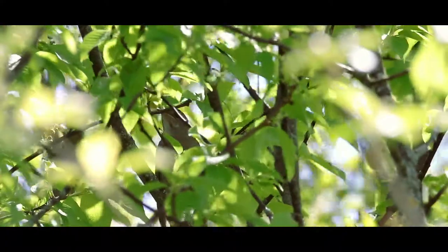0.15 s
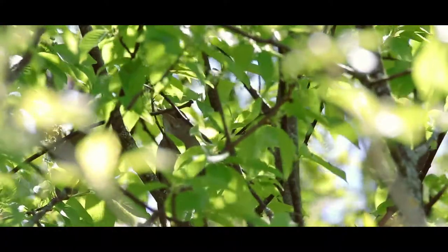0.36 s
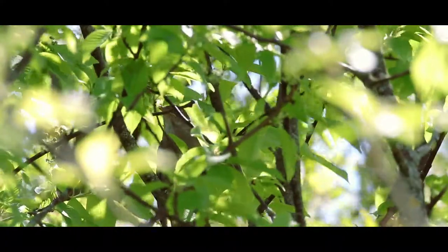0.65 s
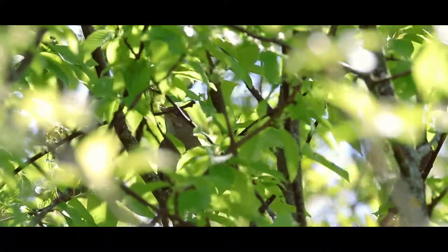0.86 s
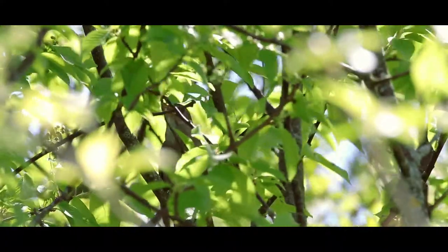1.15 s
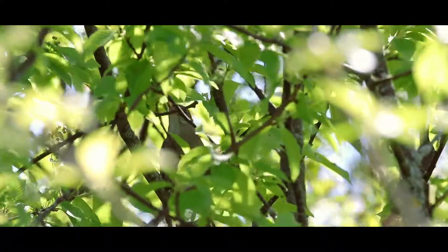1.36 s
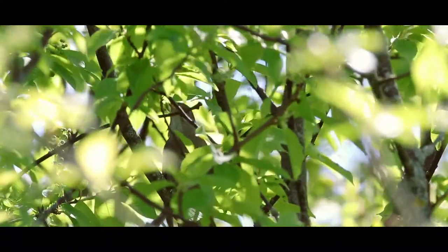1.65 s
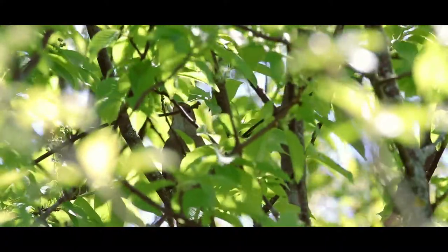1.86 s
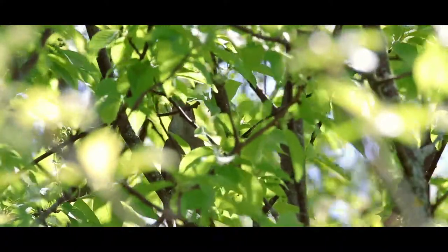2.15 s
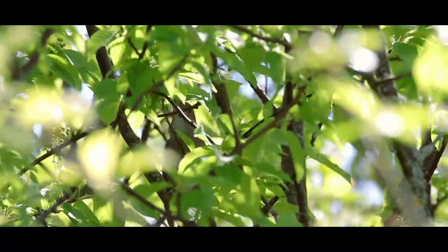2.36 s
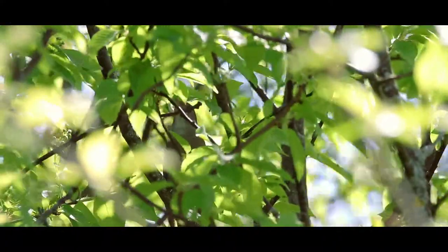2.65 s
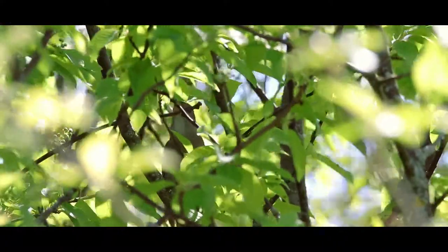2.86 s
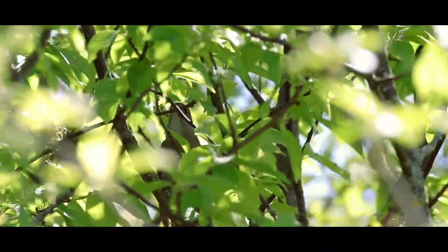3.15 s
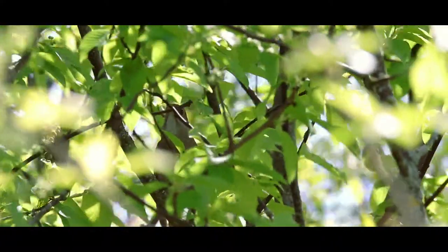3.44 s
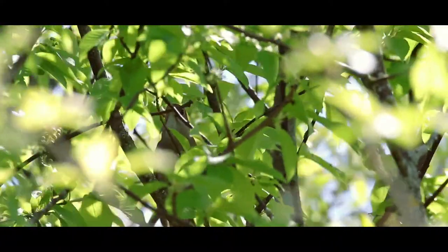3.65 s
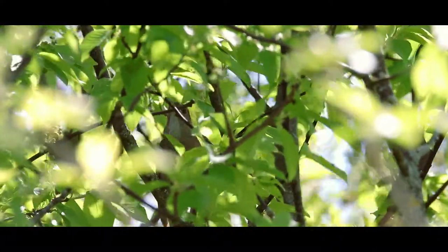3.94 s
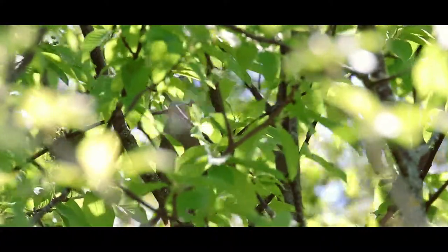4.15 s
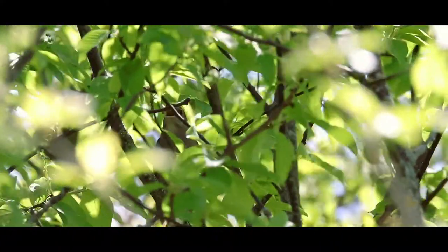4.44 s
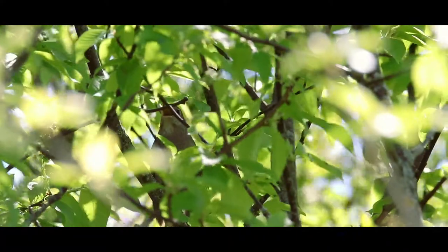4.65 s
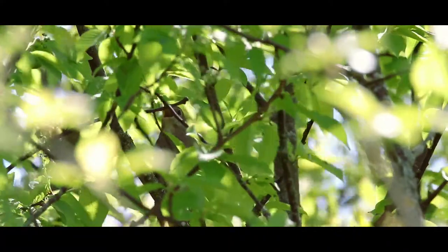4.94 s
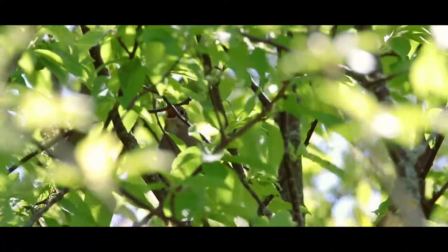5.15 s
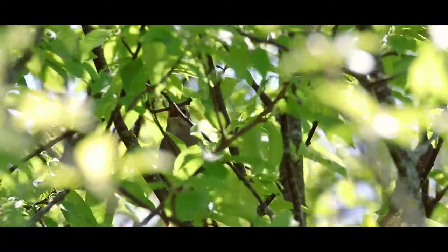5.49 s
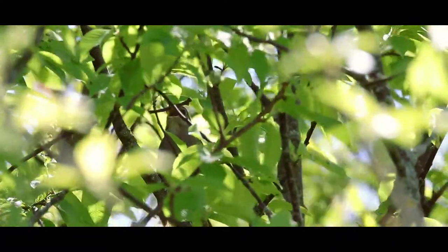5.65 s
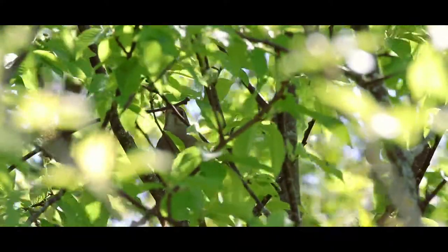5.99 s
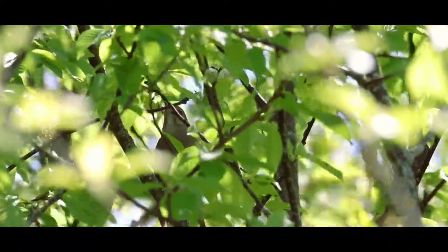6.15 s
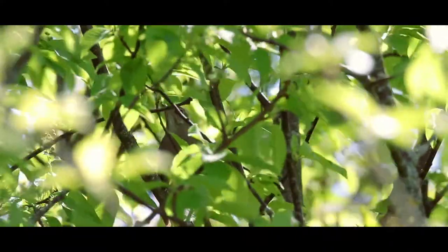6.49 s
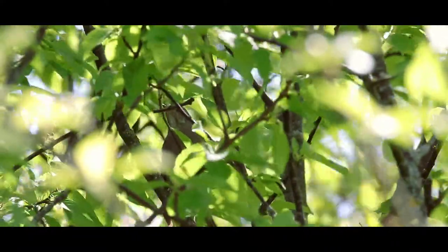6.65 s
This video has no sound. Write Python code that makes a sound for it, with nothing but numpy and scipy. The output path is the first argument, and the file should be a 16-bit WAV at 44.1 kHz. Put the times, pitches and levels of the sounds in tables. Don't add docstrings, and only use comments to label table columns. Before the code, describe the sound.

A hidden bird sings one loud phrase in leafy trees: paired whistles, eight rich repeated chook notes, a dry fast rattle and a sharp high closing slur.

```python
import sys
import numpy as np
from scipy import signal
from scipy.fft import rfft, irfft, next_fast_len
from scipy.io import wavfile
from scipy.ndimage import uniform_filter1d

SR = 44100
rng = np.random.default_rng(int(sys.argv[2]) if len(sys.argv) > 2 else 0)


def boost(x):
    u = np.asarray(x, float) / 20
    return 10 ** u


def pcm_store(signal):
    levels = np.round(np.clip(np.atleast_2d(signal), -1, 1) * 32767)
    wavfile.write(sys.argv[1], SR, levels.astype(np.int16).T)


N = 300762
LEAD = 8820

# peak_s, level_db, half_width_s
GUSTS = [(0.919, -74, 0.027), (1.18, -78, 0.027), (2.18, -67.5, 0.012), (2.961, -67, 0.025),
         (3.1, -71, 0.027), (3.25, -66, .035), (3.401, -74, .05), (3.59, -69, .035), (3.71, -57.5, 0.023),
         (3.86, -65, 0.051), (3.94, -56.5, 0.031), (4.065, -62, 0.02), (4.155, -62, 0.021),
         (4.475, -56.5, 0.032), (4.54, -60, 0.02), (4.615, -55, 0.018), (5.01, -68, 0.017),
         (5.13, -82, 0.016), (5.87, -71, 0.028), (6.59, -80, 0.034), (6.82, -78, 0.027)]
# freq_hz, level_db_per_hz
AIR_SPECTRUM = [(59, -35), (100, -8.5), (177, -2.5), (266, -2), (328, 0), (415, 4), (547, -9), (595, -5),
                (1610, -1), (2420, -9), (4020, -18.5), (6290, -22.5), (9820, -16.5), (15000, -42),
                (16000, -26)]
# freq_hz, correlation
AIR_CORRELATION = [(60, 0.75), (180, 1), (550, 0.54), (1650, -0.49), (4970, 0.036), (15000, 0.018)]
# freq_hz, left_minus_right_db
AIR_BALANCE = [(60, -4), (240, -1), (950, 2.0), (3770, -1.5), (15000, -0.5)]
# start_s, start_hz, end_hz, length_s, level_db
FAR_SLURS = [(.035, 3600, 4200, .03, -77), (.066, 4150, 3330, .026, -75), (.32, 3400, 3900, .03, -75),
             (.35, 3950, 4030, .035, -75), (3.52, 3890, 4660, 0.013, -73), (3.54, 4650, 3980, .015, -74),
             (6.40, 5100, 4220, .05, -81), (5.845, 4500, 4100, .02, -80), (5.903, 3520, 3400, 0.013, -74),
             (5.908, 4500, 4850, .016, -75), (5.938, 4050, 4300, .018, -76), (6.003, 3300, 3550, .022, -77),
             (6.07, 5340, 4900, 0.018, -82), (6.092, 4950, 4450, .022, -80), (6.112, 4800, 4500, .018, -77),
             (6.128, 4800, 4550, .018, -80), (6.15, 4750, 4550, .016, -81), (6.168, 3850, 4050, .02, -77),
             (6.222, 2630, 2800, .018, -71)]
# freq_hz, left_minus_right_db
BIRD_BALANCE = [(900, 2.5), (2200, -5.5), (4300, 0), (6800, -4.5), (11000, -1.5)]
OVERTONES_DB = [-38.5, -40, -51, -51, -41.5, -34.5]
# freq_hz, gain_db
OPEN_THROAT = [(1200, -12), (2300, -26), (3200, -11.5), (4360, -9), (5500, -12), (6700, 0.5), (7800, -8),
               (10000, -13), (12000, -36), (15500, -33)]
# freq_hz, gain_db
SOFT_THROAT = [(1200, -33), (2400, -10), (3600, -3), (4700, -4.5), (7000, -21), (10000, -26), (15500, -33)]
# start_s, length_s, start_rate_hz, end_rate_hz, level_db
TICKS = [
    (0.279, 0.012, 1080, 1005, -65),
    (0.988, .014, 917, 820, -63),
    (1.564, .015, 1205, 1130, -55),
    (6.631, 0.021, 1370, 1550, -70.5),
]
# time_s, pulse_rate_hz, level_db
RISING_BUZZ = [(4.324, 1245, -64), (4.335, 1425, -49), (4.345, 1720, -44), (4.356, 2230, -43.5),
               (4.364, 2790, -40.5), (4.371, 3360, -39.5), (4.379, 4500, -43.5), (4.383, 4940, -60)]
# start_s, peak_db, upper_pitch_hz, lower_pitch_hz
RATTLE = [(4.4215, -39, 6370, 4300), (4.471, -36.5, 6770, 4240), (4.5198, -36, 7000, 3930),
          (4.57, -34.5, 6850, 4200), (4.62, -31, 6680, 4140), (4.67, -38, 7120, 3970),
          (4.7215, -32, 6630, 4010), (4.771, -30.5, 6600, 4500), (4.8193, -33, 6800, 4140),
          (4.869, -35, 6540, 4420), (4.9158, -31.5, 6560, 4200), (4.9639, -31, 6450, 4400),
          (5.011, -28, 6770, 4650), (5.0604, -34.5, 6840, 4660), (5.1082, -31.5, 6520, 5200),
          (5.1532, -33, 6800, 4050), (5.2014, -29.5, 6840, 4430), (5.2495, -28, 6840, 4420),
          (5.2976, -28, 6730, 4600), (5.3467, -31, 6600, 4600), (5.3941, -32, 6400, 4540),
          (5.444, -31, 6500, 4840), (5.4942, -31.5, 6620, 4550), (5.542, -36, 6680, 4640),
          (5.5915, -32.5, 6740, 4660), (5.64, -31, 6820, 4560)]
# time_s, lower_voice_db, top_partials_db
RATTLE_EFFORT = [(4.42, -51.5, -62), (4.68, -47, -69), (4.9, -44.5, -50), (5.2, -48.5, -57),
                 (5.4, -45, -53), (5.64, -47, -57)]
# time_s, pitch_hz, level_db
SLUR = [
    [(5.703, 10000, -64), (5.708, 9070, -52.5), (5.712, 8400, -47), (5.7145, 7500, -62),
     (5.717, 6780, -38.5), (5.723, 6810, -35.5), (5.732, 6250, -43.5), (5.742, 5900, -54),
     (5.746, 5900, -62)],
    [(5.733, 5270, -68), (5.738, 4780, -60), (5.746, 4120, -55), (5.75, 3900, -66)],
]
# start_s, length_s, start_hz, end_hz, level_db
RISES = [
    (0.572, 0.046, 1804, 2258, -43),
    (1.2082, 0.044, 1910, 2426, -35),
    (1.763, .0495, 2025, 2255, -31.5),
]
# start_s, length_s, rest_hz, drop_hz, level_db
DROPS = [
    (-.075, 0.091, 2100, 520, -41.5),
    (.6645, 0.066, 2063, 509, -34),
    (1.2969, 0.071, 2066, 764, -28),
    (1.8535, 0.07, 1998, 702, -23.5),
]
# time_s, pitch_hz, level_db
SCOOP = [(2.141, 971, -70), (2.189, 1020, -58.5), (2.218, 1168, -51), (2.235, 1430, -37),
         (2.251, 1483, -33), (2.262, 1365, -49), (2.274, 1410, -87)]
# time_s, pitch_hz, level_db
SQUEAK = [(4.381, 7300, -54), (4.386, 7700, -52), (4.391, 7900, -49), (4.396, 7750, -62)]
# start_s, level_db, stretch_ratio, dip_hz, arch_top_hz
CHOOKS = [
    (2.4405, -25, 1.05, 1293, 1702),
    (2.6793, -22, 0.98, 1390, 1960),
    (2.923, -23, 1.015, 1337, 1896),
    (3.157, -23, 1.01, 1290, 1828),
    (3.3974, -21, 0.98, 1390, 1917),
    (3.6390, -22.5, 1.03, 1313, 2007),
    (3.88, -22.5, 1.027, 1302, 1816),
    (4.127, -21.5, 1.01, 1403, 1798),
]
# peak_s, pitch_hz, level_db
PIPS = [
    (2.555, 904, -58),
    (2.79, 966, -58.5),
    (3.045, 890, -57),
    (3.269, 1053, -49),
    (3.511, 1052, -48.5),
    (3.749, 1045, -56),
    (3.988, 946, -57),
    (4.241, 1143, -49),
]

BREEZE_DB = -74.5
AIR_DB = -61
TRUNK_CLUMP_DB = 3.2
TICK_ATTACK_S, TICK_RELEASE_S = 0.004, 0.0066
RATTLE_TICK_S = 0.00327
TOP_SCATTER_DB = -2
RISE_ATTACK_S, RISE_RELEASE_S = 0.0028, 0.0033
SOFT_START = 0.94
SWELL_DB, SWELL_AT, SWELL_WIDTH = 5.5, 0.64, 0.3
DROOP_HZ = 170
DROP_S, FLICK_HZ, FLICK_S = 0.017, 453, 0.0019
DROP_ATTACK_S, DROP_RELEASE_S, DROP_FADE_DB_PER_S = 0.0056, 0.025, 105
CHOOK_S, DIP_S, ARCH_S = 0.072, 0.025, 0.037
FALL_HZ, FALL_CURVE = 2800, 1.33
CHOOK_FLICK_HZ, CHOOK_FLICK_S = 540, 0.000656
ARCH_CURVE, SAG_HZ_PER_S = 1.77, 1330
STRIKE_ATTACK_S, STRIKE_HOLD_S, STRIKE_FADE_DB_PER_S = 0.0019, 0.0066, 1898
ARCH_DB, DIP_DB, CHOOK_RELEASE_S = -4.5, -9.5, 0.013


def at_hz(points, hz):
    points_hz, values = np.transpose(points)
    return np.interp(np.log(hz), np.log(points_hz), values)


def rms_one(x):
    return x / np.sqrt(np.mean(x ** 2) + 1e-20)


def band_pass(x, order, low_hz, high_hz):
    return signal.sosfilt(signal.butter(order, [low_hz, high_hz], "band", fs=SR, output="sos"), x)


def drift(rate_hz):
    pole = np.exp(-16 * np.pi * rate_hz / SR)
    white = rng.standard_normal((N + LEAD) // 8 + 3002)
    slow = signal.lfilter([1], [1, -2 * pole, pole * pole], white)[3000:]
    return np.interp(np.arange(N + LEAD) / 8, np.arange(len(slow)), rms_one(slow))


def wind():
    t = np.arange(N) / SR
    gusts = sum(boost(db) * np.exp(-((t - s) / width_s) ** 2) for s, db, width_s in GUSTS)
    force = boost(BREEZE_DB) + gusts
    low = band_pass(rng.standard_normal((2, N)), 2, 26, 120)
    lumps = boost(2.3 * np.array([drift(7.1)[:N], drift(41)[:N]]))
    port_gain = boost(7 + np.array([[0.8], [-0.8]]))
    return force * port_gain * rms_one(low * lumps)


def air(patchy_db):
    out = 0
    together = drift(1.2)[:N]
    edges_hz = 100 * 2 ** np.arange(0, 7.6, 0.5)
    white = rng.standard_normal((2, 2, N))
    for k, (low_hz, high_hz) in enumerate(zip(edges_hz, edges_hz[1:])):
        mid, side = band_pass(white[k % 2], 2, low_hz, high_hz)
        hz = np.sqrt(low_hz * high_hz)
        alike = np.clip(at_hz(AIR_CORRELATION, hz), -1, 1)
        balance_db = at_hz(AIR_BALANCE, hz) * np.array([[0.5], [-0.5]])
        patches_db = patchy_db * (0.5 * together + drift(13.4)[:N])
        gain = boost(at_hz(AIR_SPECTRUM, hz) + balance_db + patches_db)
        out = out + gain * (np.sqrt(1 + alike) * mid + np.sqrt(1 - alike) * side * [[1], [-1]])
    return boost(AIR_DB + 2.0) * rms_one(out)


def add(out, rows, partials, smooth_s=0.0019, rough=0.):
    s, hz, level_db = np.transpose(rows)
    at = np.arange(int(s[0] * SR), int(s[-1] * SR))
    smooth = max(int(smooth_s * SR), 1)
    hz = uniform_filter1d(np.interp(at / SR, s, hz), smooth, mode="nearest")
    jitter = rough * uniform_filter1d(rng.standard_normal(N // 40), size=16)[:len(at)]
    phase = np.cumsum(2 * np.pi * hz * (1 + jitter) / SR) + rng.uniform(0, 2 * np.pi)
    edge = np.minimum(np.minimum(at - at[0], at[-1] - at) / 22, 1)
    gain = np.interp(at / SR, s, boost(level_db))
    wave = sum(g * np.sin((k + 1) * phase + k * k) for k, g in enumerate(partials(hz, gain)))
    out[at + LEAD] += np.sqrt(2) * gain * edge * wave


def beak(hz):
    peak_db = 8.6 * np.exp(-((hz - 10400) / 1300) ** 2)
    fall_db = np.clip(hz - 11500, 0, None) / 220
    return boost(peak_db - fall_db) * (hz < 16000)


def pure(hz, gain):
    effort = (gain / boost(-27)) ** 0.3
    return [1] + [boost(db) * effort * beak((k + 2) * hz) for k, db in enumerate(OVERTONES_DB)]


def hollow(hz, gain):
    gains = pure(hz, gain)
    octave_lift = boost(8 * np.exp(-((2 * hz - 3150) / 850) ** 2))
    return [1, gains[1] * octave_lift] + [g * boost(-5) for g in gains[2:]]


def buzzy(throat):
    def partials(hz, gain):
        return [boost(at_hz(throat, k * hz) - 2.6 * (k - 4)) * (k * hz < 16000) for k in np.arange(1, 13)]
    return partials


def breath(x, low_hz, high_hz, db):
    hiss = band_pass(rng.standard_normal(len(x)), 3, low_hz, high_hz)
    return boost(db) * hiss * np.sqrt(uniform_filter1d(x ** 2, size=120).clip(0))


def ramps_db(t, attack_s, release_s):
    return 20 * np.log10(np.clip(np.minimum(t / attack_s, (t[-1] - t) / release_s), 0.02, 1))


def far_birds():
    out = np.zeros(N + LEAD)
    for s, start_hz, end_hz, length_s, level_db in FAR_SLURS:
        rows = [(s, start_hz, level_db + 1),
                (s + length_s / 2, (start_hz + end_hz) / 2, level_db),
                (s + length_s, end_hz, level_db - 3)]
        add(out, rows, pure)
    return out[LEAD:] * boost([[1.5], [-1.5]])


def trees(x, near_db, far_db):
    t = np.arange(SR) / SR
    sparse = rng.standard_normal((3, SR)) * boost(4 * rng.standard_normal((3, SR)))
    shared = 0.27 * sparse[0] + sparse[1:]
    near = boost(near_db - 60 * t / 0.08) * np.clip(t / 0.00069 - 1, 0, 1)
    far = boost(far_db - 60 * t / 0.65 + TRUNK_CLUMP_DB * drift(80)[:SR]) * np.minimum(t / 0.05, 1)
    size = next_fast_len(len(x) + SR)
    hz = np.arange(size // 2 + 1) * SR / size + 1
    small = (hz / 4000) ** 0.71
    dull = 1 / (1 + (hz / 9000) ** 2)
    scatter = small * rfft(shared * near, size) + dull * rfft(shared * far, size)
    direct = boost(at_hz(BIRD_BALANCE, hz) * [[0.5], [-0.5]])
    return irfft(rfft(x, size) * (direct + scatter), size)[:, LEAD:LEAD + N]


def buzzes():
    ticks, rise = np.zeros((2, N + LEAD))
    for s, length_s, start_hz, end_hz, level_db in TICKS:
        t = np.linspace(0, length_s, num=30)
        hz = start_hz + (end_hz - start_hz) * t / length_s
        rows = np.c_[s + t, hz, level_db + ramps_db(t, TICK_ATTACK_S, TICK_RELEASE_S)]
        add(ticks, rows, buzzy(SOFT_THROAT), rough=0.13)
    add(rise, RISING_BUZZ, buzzy(OPEN_THROAT), rough=0.051)
    tick_hiss = breath(ticks, low_hz=2200, high_hz=7500, db=0.5)
    rise_hiss = breath(rise, low_hz=4500, high_hz=10200, db=-6.5)
    return ticks + tick_hiss + rise + rise_hiss


def rattle():
    out = np.zeros(N + LEAD)
    at_s, lower_db, tops_db = np.transpose(RATTLE_EFFORT)
    for k, (s, peak_db, upper_hz, lower_hz) in enumerate(RATTLE):
        hz, db = upper_hz / 2, peak_db - 8
        top_db = np.interp(s, at_s, tops_db) + TOP_SCATTER_DB * np.sin(k * k) - db
        colour = boost(np.array([-22, 0.1, top_db, top_db - 13]))
        upper = [(s - 0.0001, hz * 1.014, db - 22),
                 (s + 0.18 * RATTLE_TICK_S, hz, db - 5.0),
                 (s + 0.75 * RATTLE_TICK_S, hz * 1.017, db),
                 (s + RATTLE_TICK_S, hz * 0.9, db - 26)]
        add(out, upper, lambda hz, gain: colour, smooth_s=0.00069, rough=0.16)
        low_db = np.interp(s, at_s, lower_db)
        lower = [(s - 0.0003, lower_hz * 1.205, low_db - 12),
                 (s + 0.29 * RATTLE_TICK_S, lower_hz * 1.004, low_db),
                 (s + 0.72 * RATTLE_TICK_S, lower_hz * 0.937, low_db - 1.5),
                 (s + 1.17 * RATTLE_TICK_S, lower_hz * 0.72, low_db - 14)]
        add(out, lower, pure, smooth_s=0.00039, rough=0.079)
    return out + breath(out, low_hz=5500, high_hz=10670, db=-4.0)


def slur():
    out = np.zeros(N + LEAD)
    for rows in SLUR:
        add(out, rows, pure, rough=0.036)
    return out + breath(np.tanh(out / boost(-57)), low_hz=4500, high_hz=10000, db=-58.0)


def rise_note(s, length_s, start_hz, end_hz, level_db):
    t = np.linspace(0, length_s, num=100)
    share = t / length_s
    swell_db = SWELL_DB * np.exp(-((share - SWELL_AT) / SWELL_WIDTH) ** 2)
    attack_s = RISE_ATTACK_S * boost(SOFT_START * (-30 - level_db))
    hz = start_hz + (end_hz - start_hz) * share - DROOP_HZ * share ** 8
    return np.c_[s + t, hz, level_db + swell_db + ramps_db(t, attack_s, RISE_RELEASE_S)]


def drop_note(s, length_s, rest_hz, drop_hz, level_db):
    t = np.linspace(0, length_s, num=140)
    hz = rest_hz + drop_hz * np.exp(-t / DROP_S) + FLICK_HZ * np.exp(-t / FLICK_S)
    fade_db = -DROP_FADE_DB_PER_S * t
    return np.c_[s + t, hz, level_db + fade_db + ramps_db(t, DROP_ATTACK_S, DROP_RELEASE_S)]


def chook_note(s, level_db, stretch, dip_hz, top_hz):
    t = np.linspace(0, CHOOK_S, num=200)
    after = np.clip(t - DIP_S, 0, None)
    arch = np.sin(np.pi * np.minimum(after / ARCH_S, 1)).clip(0) ** ARCH_CURVE
    fall = (FALL_HZ - dip_hz) * np.clip(1 - t / DIP_S, 0, 1) ** FALL_CURVE
    flick = CHOOK_FLICK_HZ * np.exp(-t / CHOOK_FLICK_S)
    arch_hz = top_hz - dip_hz + SAG_HZ_PER_S * ARCH_S / 2
    hz = dip_hz + fall + flick + arch_hz * arch - SAG_HZ_PER_S * after
    strike = boost(-STRIKE_FADE_DB_PER_S * np.clip(t - STRIKE_HOLD_S, 0, None))
    gain_db = 20 * np.log10(strike + boost(ARCH_DB + DIP_DB * (1 - arch)))
    ramp_db = ramps_db(t, STRIKE_ATTACK_S, CHOOK_RELEASE_S)
    return np.c_[s + t * stretch, hz, level_db - 2 + gain_db + ramp_db]


def pip_note(s, hz, level_db):
    return [(s - 0.014, hz * 0.94, level_db - 37), (s - 0.004, hz, level_db),
            (s + 0.005, hz, level_db - 9.0), (s + 0.015, hz * 1.22, level_db - 28)]


def whistles():
    clear, chooks = np.zeros((2, N + LEAD))
    for rows in [rise_note(*row) for row in RISES] + [drop_note(*row) for row in DROPS] + [SQUEAK]:
        add(clear, rows, pure, rough=0.006)
    add(clear, SCOOP, hollow, rough=0.006)
    for row in CHOOKS:
        add(chooks, chook_note(*row), hollow, smooth_s=0.001, rough=0.02)
    for row in PIPS:
        add(clear, pip_note(*row), pure)
    arches = signal.sosfilt(signal.butter(8, 1950, fs=SR, output="sos"), chooks)
    chook_hiss = breath(arches, low_hz=9140, high_hz=11100, db=-23.5)
    clear_hiss = breath(clear, low_hz=5000, high_hz=10850, db=-58)
    flutter = boost(1.1 * drift(70))
    return (clear + chooks) * flutter + chook_hiss + clear_hiss


def scene():
    song = whistles() + buzzes() + rattle() + slur()
    return trees(song, near_db=-32.5, far_db=-51.0) + far_birds() + air(patchy_db=1.61) + wind()


def ragged_top(x):
    ticks_s = np.array(RATTLE)[:, 0]
    at = np.arange(int(4.4 * SR), int(5.7 * SR))
    t, part = at / SR, x[:, at]
    last = np.clip(np.searchsorted(ticks_s - 0.003, t) - 1, 0, None)
    for edge_hz, longest_s in [(12600, 0.022), (11600, 0.09)]:
        held_s = rng.uniform(0.25, 1, len(ticks_s)) * longest_s
        shut = (t > 4.455) & (t < 5.665) & (t - ticks_s[last] > held_s[last])
        top = signal.sosfiltfilt(signal.butter(10, edge_hz, "high", fs=SR, output="sos"), part)
        part = part - top * uniform_filter1d(shut * 1., size=60)
    return np.c_[x[:, :at[0]], part, x[:, at[-1] + 1:]]


def low_pass(x):
    return signal.sosfilt(signal.butter(12, 16290, fs=SR, output="sos"), x)


def record(dry):
    cut = signal.sosfilt(signal.cheby2(10, 50, 16700, fs=SR, output="sos"), dry)
    mix = ragged_top(cut)
    return low_pass(mix)


dry = scene()
out = record(dry)
pcm_store(out)
```